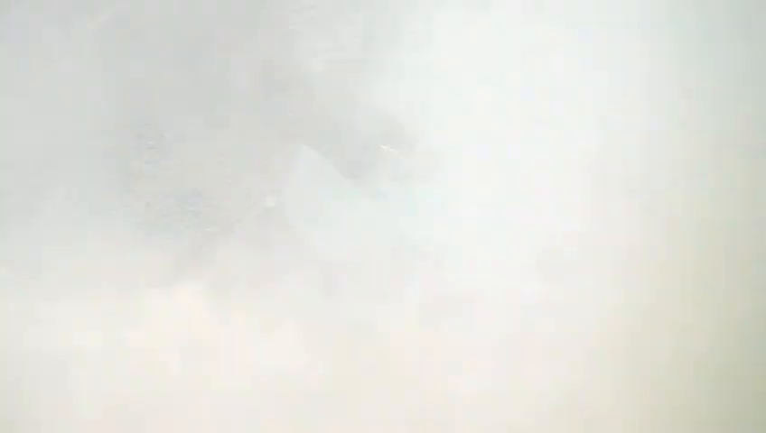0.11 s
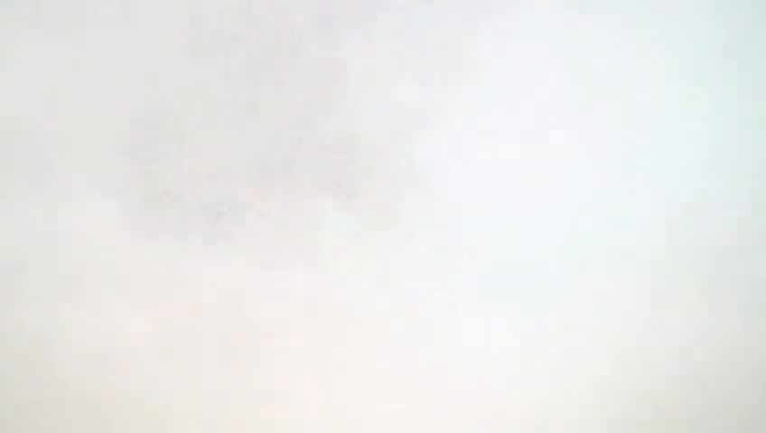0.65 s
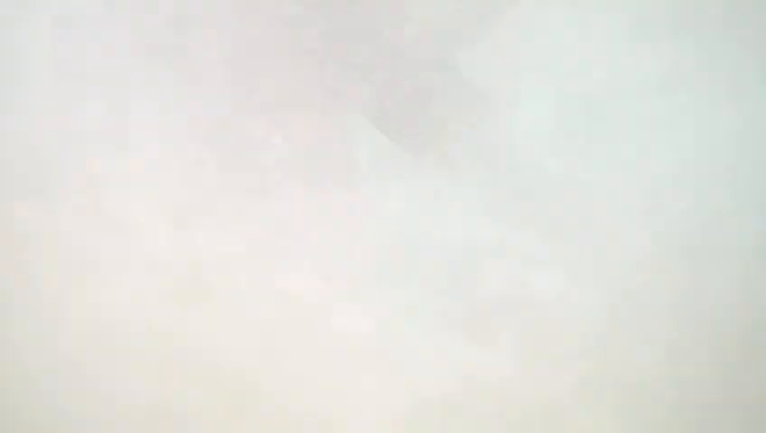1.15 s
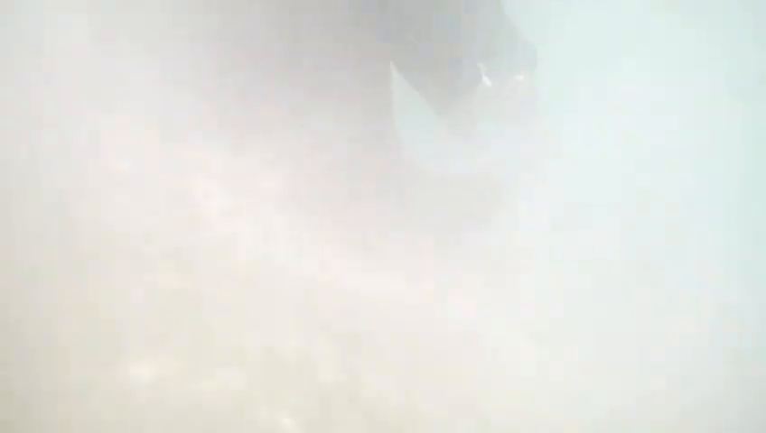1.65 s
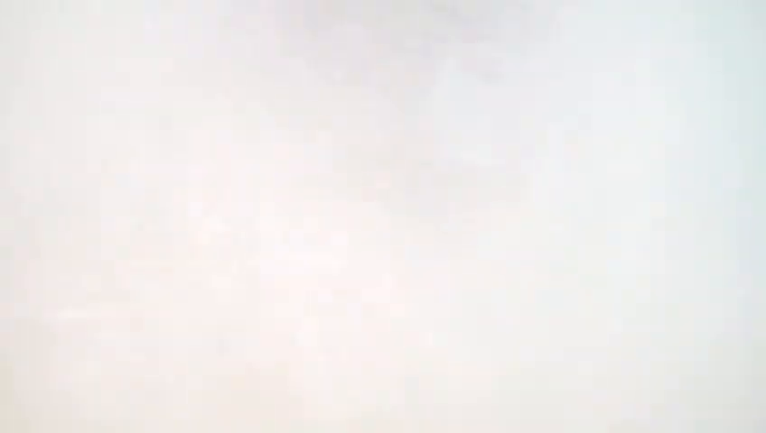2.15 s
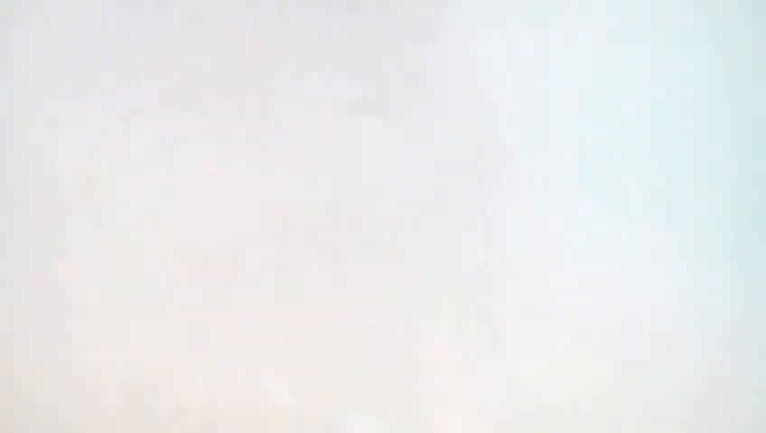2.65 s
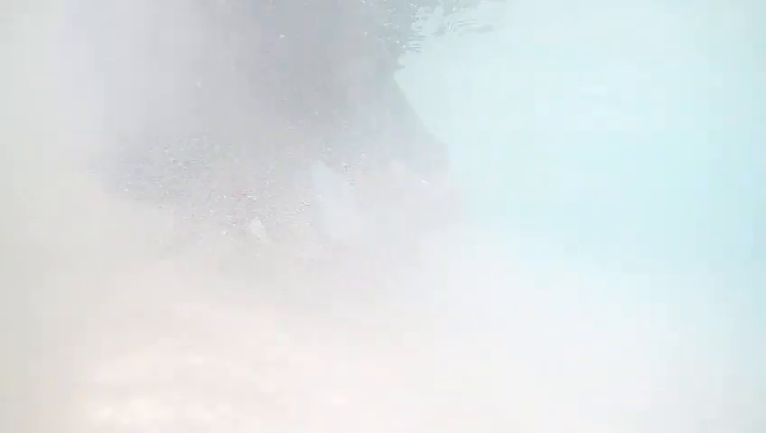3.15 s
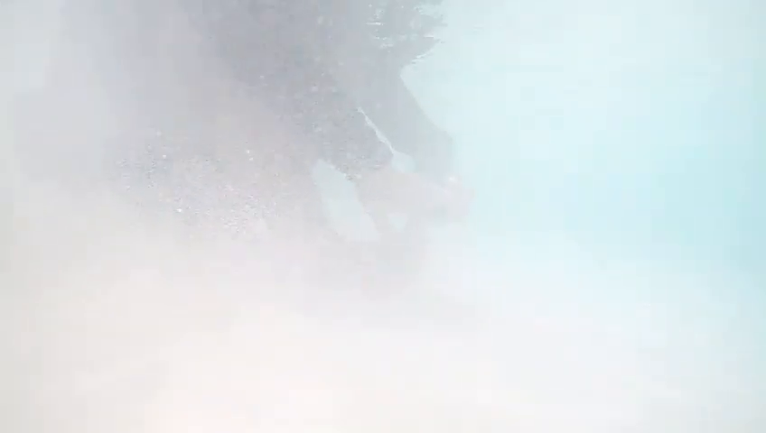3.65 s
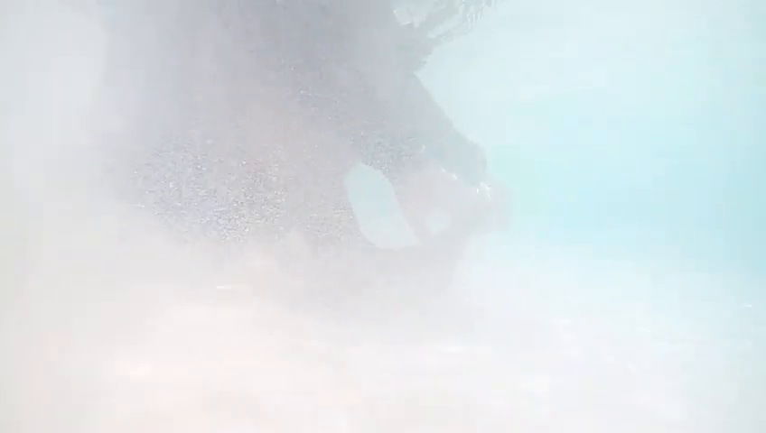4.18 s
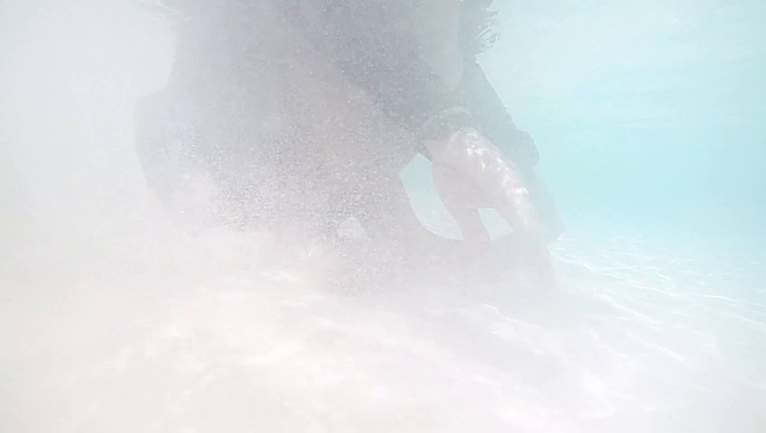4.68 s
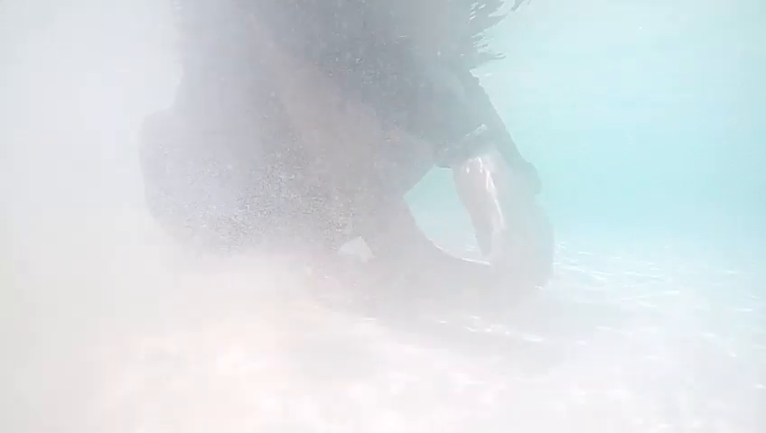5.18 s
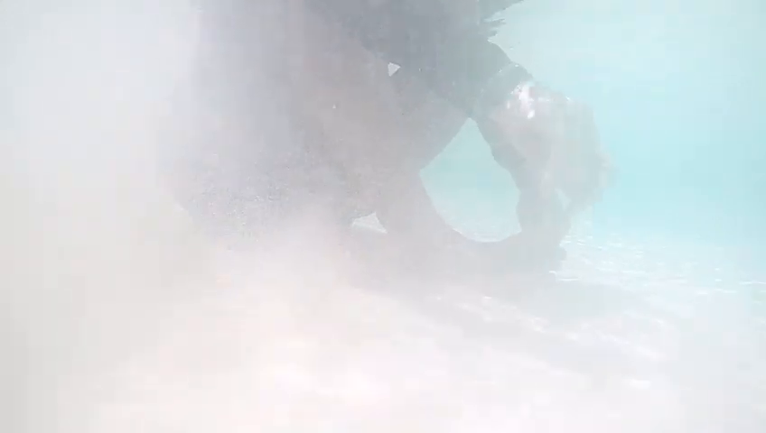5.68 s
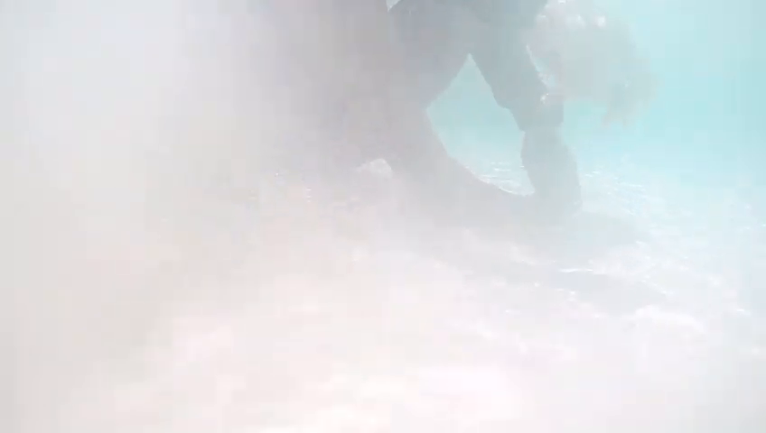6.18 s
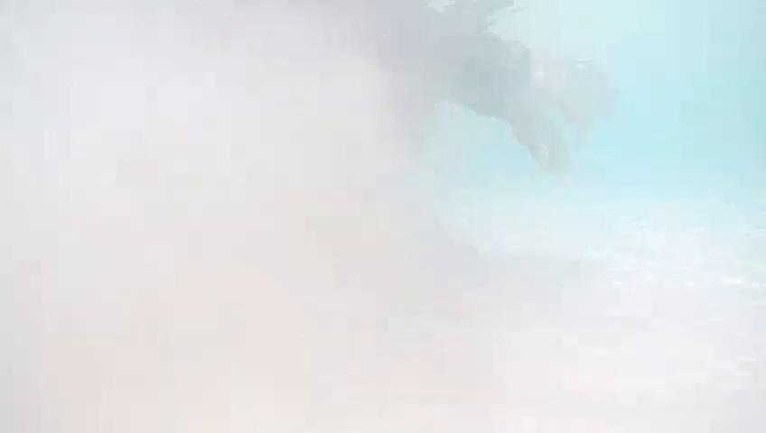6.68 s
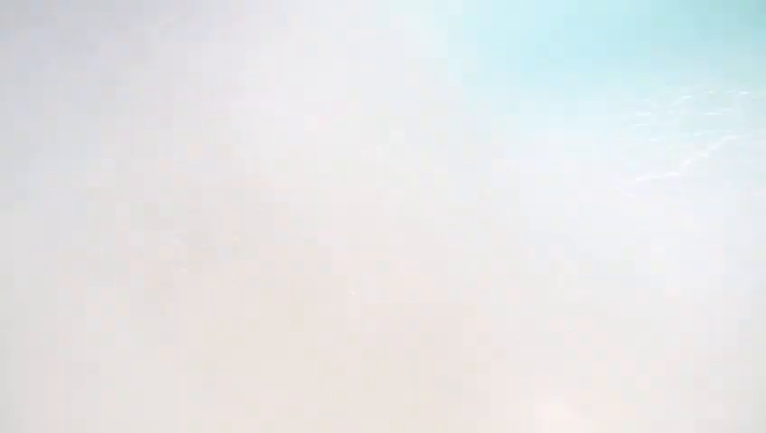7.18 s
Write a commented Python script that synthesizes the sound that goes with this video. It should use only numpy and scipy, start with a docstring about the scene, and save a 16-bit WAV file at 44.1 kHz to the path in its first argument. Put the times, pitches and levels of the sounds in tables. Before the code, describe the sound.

A microphone sealed inside a camera case hears low boxy booms as the case is handled on a sandy seabed. Creaky scrapes, taps and short bubbling tones ride over a low rumbling drone and soft grainy wash. Busy at the start, sparser in the middle with a loud cluster past four seconds, then a swell of water and closing knocks.

```python
"""Sealed housing in sandy shallows

A microphone sits in a sealed housing held under shallow, sandy water. Knocks and shoves are short, low
tones, the booms of the air cavity inside. Grit, fingers and sand are bursts and streams of noise that tick,
scrape and hiss through the shell's resonances; short gliding tones glug, hum and squeak, and once the grip
judders. Moving water rumbles, drones and gurgles as shaped noise. A limiter holds the loudest booms."""
import sys
import numpy as np
from scipy import signal
from scipy.io import wavfile
from scipy.ndimage import uniform_filter1d, minimum_filter1d

SR = 44100
rng = np.random.default_rng(int(sys.argv[2]) if len(sys.argv) > 2 else 0)


def unload_wav(signal):
    """Save mono or channel-first audio to the path in sys.argv[1] as 16-bit WAV at rate SR, clipped to [-1, 1]."""
    wavfile.write(
        sys.argv[1],
        SR,
        np.round(np.clip(np.atleast_2d(signal).T, -1, 1) * 32767).astype(np.int16),
    )


def ratio(d):
    """dB to gain"""
    e = np.asarray(d, float) / 20
    return 10 ** e


N = 322812   # samples in the scene

# Levels in the tables are relative: filters and mixing gains come on top.
# knocks that set the cavity booming: t/s, level/dB, f/Hz, length/s
KNOCK_EVENTS = [(0.072, -8, 180, 0.04), (.188, -9, 180, .022), (0.153, -7.5, 156, 0.034),
                (0.274, -3, 213, 0.041), (0.43, -6, 161, 0.031), (0.541, -10.5, 152, 0.026),
                (0.655, -4, 136.8, 0.063), (0.731, -6.5, 157.5, 0.083), (0.789, -11.5, 180.3, 0.068),
                (0.891, -3.5, 144.7, 0.036), (1.206, -3, 146.6, 0.042), (1.245, -3.5, 140, 0.043),
                (1.297, -9.5, 165, 0.031), (1.53, -3, 166.4, 0.037), (1.586, -7.5, 164, 0.038),
                (1.692, -6, 182, 0.039), (1.737, -15.5, 172, 0.035), (1.957, -16, 139.3, 0.05),
                (2.089, -9, 167, 0.038), (2.137, -10.5, 172, 0.033), (2.23, -13, 164, 0.024),
                (2.323, -14.5, 175, 0.048), (2.416, -14, 185.7, 0.069), (2.612, -8.5, 156, 0.03),
                (2.662, -4.5, 179, 0.047), (2.745, -4.5, 146, 0.04), (2.993, -11.5, 190.6, 0.031),
                (3.156, 2, 179.4, 0.03), (3.192, 0, 168.3, 0.03), (3.342, -3, 173, 0.046),
                (3.673, -8.5, 156.6, 0.045), (3.703, -1.5, 164, 0.038), (4.077, -17, 163, 0.038),
                (4.184, -12.5, 136.3, 0.04), (4.312, 0.5, 177.9, 0.053), (4.36, 2, 171.6, 0.031),
                (4.409, 3, 160, 0.049), (4.449, -4.5, 174.7, 0.056), (4.754, -15, 145.3, 0.044),
                (5.045, 1.5, 176.4, 0.062), (5.246, -16.5, 166, 0.035), (5.863, -11.5, 174.2, 0.055),
                (6.288, -8, 155, 0.041), (6.772, -2, 156.8, 0.032), (6.963, -5.5, 194, 0.028),
                (7.019, -6.5, 142, 0.021), (7.117, -11, 195, 0.042), (7.138, -4, 140, 0.037),
                (7.182, 0.5, 171.3, 0.056), (7.303, -7.5, 185.2, 0.053)]
# sharp ticks on the shell: t/s, level/dB, treble against middle/dB
TICK_EVENTS = [(.113, -24, -12), (.205, -28, -25), (0.181, -15.5, -26.5), (0.4338, -22.5, -2.5),
               (0.4796, -25, -41.5), (0.5136, -11, -25.5), (0.5629, -16.5, -19), (0.676, -21.5, -15.5),
               (1.1987, -20, -10), (1.208, -20, -18), (1.2382, -14, -18), (1.26, -26, -18),
               (1.291, -36, -6.5), (1.5259, -14.5, -22.5), (1.5845, -31.5, -12), (1.6823, -44, 6.5),
               (1.725, -27.5, -25), (1.781, -39.5, 0), (1.9614, -25, -13), (2.0404, -36.5, -7),
               (2.14, -22, 1), (2.2276, -26, -33), (2.414, -34, -20), (2.4887, -28, -25), (2.726, -25, -14),
               (2.742, -25, -16), (3.1555, -13.5, -17), (3.1896, -15, -16), (3.6687, -30.5, -5.5),
               (4.3298, -26.5, 0.5), (4.3595, -17, -14), (4.5265, -37, 3.5), (4.7432, -32.5, -36),
               (6.4405, -32, -6), (6.93, -20, -12), (7.183, -24, -25)]
# scrapes and swishes: t/s, hiss level/dB, creak against hiss/dB, length/s
SCRAPE_EVENTS = [(.068, -35, 5, .13), (0.261, -31, 3, 0.038), (0.298, -27.5, -5, 0.041),
                 (.526, -36.5, 1, 0.033), (0.625, -41, 2, 0.13), (.74, -39, 4.5, .054),
                 (.794, -39, 1.5, .023), (0.859, -38.5, 8, 0.045), (.926, -43.5, 11, .011),
                 (1.175, -40.5, 16, 0.044), (1.232, -43.5, 15.5, 0.046), (1.612, -48, -.5, .11),
                 (1.677, -54, 20, .03), (1.72, -48, 16.5, 0.028), (1.944, -47.5, 15, .036),
                 (2.08, -42.5, 16.5, .02), (2.119, -37, -7, .1), (2.61, -32, -1, .068),
                 (2.711, -44, 10.5, 0.054), (3.238, -35, -22, 0.038), (3.317, -37, -3.5, .035),
                 (3.35, -47, -3, 0.05), (3.661, -34.5, -1, .033), (3.698, -33, -16, 0.093),
                 (3.778, -40.5, -9, 0.048), (3.833, -47, 0.5, 0.071), (4.278, -40, 7, 0.084),
                 (4.384, -46, 11, .09), (4.454, -47.5, -2, 0.066), (4.732, -56.5, 13, 0.043),
                 (5.129, -46, 3, .15), (6.12, -38, 3, .19), (6.83, -40.5, 4, .093),
                 (6.919, -29.5, 11, 0.027), (6.94, -42, 13, .065), (6.991, -34.5, -7, 0.076),
                 (7.03, -37, -5, .18), (7.145, -43, 17, .06)]
# resonances of the shell: f/Hz, width/Hz, level/dB
SHELL_MODES = [(1800, 150, 2.5), (2750, 300, -9.5), (4120, 160, -13), (4800, 420, -4), (5540, 170, -4),
               (8670, 1100, -21.5), (12500, 1100, -41)]
# broad sound passed by the shell wall: f/Hz, level/dB
WALL_SPECTRUM = [(150, -15), (250, -17.5), (559, -1.5), (664, -11), (748, -8.5), (858, -9.5), (1150, -24),
                 (1820, -20.5), (3100, -40.5), (4520, -25), (5550, -21), (6810, -41), (15000, -70)]
# lower shell modes that creak: f/Hz, width/Hz, level/dB
CREAK_MODES = [(370, 44.4, 6), (500, 66, 0.5), (650, 82, -2), (841.6, 45, -1), (926, 176, -5.5)]
# the wall under streaming water: f/Hz, width/Hz, level/dB
GURGLE_MODES = [(290, 100, 5), (430, 150, 4), (640, 130, -2), (830, 100, 0), (960, 120, -2)]
# the air cavity inside: f/Hz, width/Hz, level/dB
CAVITY_MODES = [(151.4, 54.6, -0.5), (188.4, 50.7, 1)]
# a faint high hiss that swells and fades slowly: t/s, level/dB
HISS_CURVE = [(0.0, -62.5), (1.61, -74), (3.12, -66), (5.44, -72.5), (6.99, -58.5), (7.32, -65.5)]
# how fast water streams along the shell, as dull wash: t/s, level/dB
STREAM_CURVE = [(0, -43), (.25, -45), (.51, -50), (1.1, -52), (1.35, -61), (1.85, -58), (2.2, -52),
                (2.39, -58), (2.62, -50), (2.8, -59), (3.2, -54), (3.4, -64), (4.08, -61), (4.34, -49),
                (4.52, -65), (4.88, -64), (5.14, -54), (5.28, -66), (5.5, -64), (5.93, -51), (6.15, -40),
                (6.29, -39.5), (6.34, -49), (6.8, -47), (7, -41), (7.32, -45)]
# short gliding tones (low glugs, a faint hum, higher squeaks): t/s, level/dB, start f/Hz, end f/Hz, length/s
GLIDE_EVENTS = [(.088, -19, 330, 370, .025), (0.132, -13, 320, 345, 0.022), (.155, -14, 300, 340, 0.03),
                (0.162, -25, 618, 652, 0.035), (0.237, -38, 1310, 1425, .02),
                (0.432, -37.5, 1390, 1454, 0.019), (.515, -17, 500, 513, 0.016),
                (0.542, -25.5, 1800, 1870, 0.0057), (0.556, -34, 3080, 3130, .007),
                (0.558, -33.5, 3960, 4150, 0.0092), (0.635, -22, 490, 718, .035),
                (.672, -23, 565, 946, .022), (.681, -21.5, 450, 494, .014), (0.696, -19.5, 577, 661, .045),
                (0.748, -20.5, 524, 822, 0.033), (0.797, -18.5, 687, 845, 0.0095),
                (0.863, -17.5, 800, 866, .024), (1.718, -62, 12900, 11800, .007),
                (1.74, -61, 11900, 12500, .008), (1.894, -57, 9400, 8450, .012),
                (1.906, -62, 8600, 9800, .018), (2.08, -27, 820, 972, 0.0081), (2.528, -35, 345, 365, .12),
                (2.614, -35, 2750, 2620, .011), (2.614, -35, 5450, 5280, .011),
                (2.628, -32, 1910, 1936, 0.008), (2.632, -40, 4150, 3980, .022),
                (3.236, -33.5, 1926, 1790, 0.047), (3.259, -35, 4700, 4240, 0.013),
                (3.672, -14.5, 296, 264, 0.05), (3.781, -34.5, 4960, 4510, .04),
                (3.709, -23, 945, 1050, .007), (3.715, -28, 1300, 1545, .01),
                (3.733, -25, 1100, 1200, 0.012), (3.758, -27, 1290, 1390, .012),
                (3.767, -27.5, 1760, 1800, .02), (6.836, -24, 430, 500, .016), (6.85, -23, 600, 680, 0.028),
                (6.888, -28, 600, 625, .035), (6.866, -33.5, 1935, 1800, 0.049),
                (6.926, -33.5, 1845, 1654, 0.032), (7.002, -20, 600, 670, 0.048),
                (7.112, -29, 633, 680, 0.049), (7.147, -16, 620, 704, .022), (7.15, -22, 900, 860, .014),
                (7.171, -21, 680, 640, 0.028)]
# partials of a gliding tone, from the fundamental up: level/dB
GLIDE_PARTIALS_DB = [0, -18, -22, -33]
# heavy low shoves of water on the wall: t/s, level/dB, f/Hz
SHOVE_EVENTS = [(0.098, -10, 65), (0.403, -12.5, 56), (0.488, -6.5, 38.8), (0.711, -6.5, 67.3),
                (0.8, -4.5, 104), (1.1, -12, 55), (1.189, -2, 103.5), (1.24, -10, 60), (1.511, -11, 96),
                (1.719, -12, 102), (2.045, -9, 89), (2.069, -2, 70.5), (2.664, 1, 73.4), (3.22, -16.5, 70),
                (3.33, -13, 81), (3.651, -12.5, 109), (4.157, -10.5, 44.3), (4.317, -11, 46),
                (4.36, -9.5, 80), (4.43, -8, 90), (4.745, -19, 80.7), (5.605, -11, 83), (5.68, -15, 45),
                (5.78, -15, 60)]
# how hard the water shoves the housing, as cavity drone: t/s, level/dB
SURGE_CURVE = [(0, -20), (.5, -25), (.85, -17), (.96, -24), (1.3, -30), (1.53, -34), (1.75, -25),
               (2.18, -23), (2.4, -33), (2.6, -26), (2.95, -32), (3.22, -27), (3.45, -34), (4.12, -34.5),
               (4.34, -19.5), (4.54, -33), (4.93, -26.5), (5.28, -37), (5.57, -32), (6.1, -19), (6.4, -26),
               (6.95, -19), (7.32, -24.5)]
# the wall under the fingers: f/Hz, width/Hz, level/dB
RAP_MODES = [(500, 200, -0.5), (694, 200, -0.5), (900, 190, 0)]
# how much fine sand the water carries, as bright grains: t/s, level against the wash/dB
SAND_CURVE = [(0, 1), (1.3, 1), (2.4, -1), (4.2, -2), (5.15, -7), (5.9, -6), (6.2, -7), (6.45, -2), (7, 3),
              (7.32, -2)]

LIMIT_DB = -.7   # highest peak the limiter lets through
RUMBLE_DB, RUMBLE_FOLLOWS = -30, 0.83   # level at mean surge; share of the surge's swing
GURGLE_DB = -48   # at mean stream and surge
GURGLE_FOLLOWS_STREAM, GURGLE_FOLLOWS_SURGE = .95, .1   # shares of their swings
HUM_DB = -21   # the cavity's faint octave, against its drone
SILT_DB = 1.5   # dull part of the sand, against the wash
DULL_DB, DULL_PER_CREAK = 3.5, -0.16   # the more a scrape creaks, the less dull its hiss
# the grip judders: it lets go again and again at an even pace
JUDDER_START_S, JUDDER_EVERY_S, JUDDER_HOLD_S = 0.98, .0438, .028
JUDDER_HZ, JUDDER_BOOM_DB, JUDDER_RATTLE_DB, JUDDER_HISS_DB = 148.6, -7, -20, -42   # relative levels
RAP_HZ, RAP_JITTER_S = 150, .0005   # slaps a second, and how unevenly they fall


def rms_one(x):
    """Scale a sound to an average strength (rms) of 1."""
    return x / np.sqrt(np.mean(x ** 2) + 1e-20)


def in_time(rows):
    """Draw each column of a curve out sample by sample, in straight lines between its points."""
    s, *columns = np.transpose(rows)
    return [np.interp(np.arange(N) / SR, s, c) for c in columns]


def drift(rate):
    """Slow random wandering of spread 1: noise smoothed twice below about rate Hz."""
    # computed at every 40th sample only; the first 2000 values let the filter settle
    r = np.exp(-80 * np.pi * rate / SR)
    noise = rng.standard_normal(N // 40 + 2002)
    slow = signal.lfilter([1], [1, -2 * r, r * r], noise)[2000:]
    return np.interp(np.arange(N) / 40, np.arange(len(slow)), rms_one(slow))


def band(x, low_hz, high_hz, order=2):
    """Keep only the sound between two frequencies (Butterworth band-pass)."""
    return signal.sosfilt(signal.butter(order, [low_hz, high_hz], "band", fs=SR, output="sos"), x)


def resonate(x, modes, patchy_db=0):
    """Ring resonances side by side with alternating signs; each may flicker on its own."""
    out = 0
    for k, (hz, width, db) in enumerate(modes):
        r = np.exp(-np.pi * width / SR)   # a wider resonance dies away sooner
        top = (1 - r * r) / 2 * np.array([1, 0, -1])
        bottom = [1, -2 * r * np.cos(2 * np.pi * hz / SR), r * r]
        gain = ratio(db + patchy_db * drift(22)) if patchy_db else ratio(db)
        out = out + (-1) ** k * gain * signal.lfilter(top, bottom, x)
    return out


def shell(x, patchy_db=0):
    """The wall passes a broad, tilted spectrum; its resonances stand on top."""
    hz, db = np.transpose(WALL_SPECTRUM)
    grid = np.linspace(0, SR / 2, 1025)
    wall_db = np.interp(np.log(grid + 1), np.log(hz), db)
    # dB doubled here, because minimum_phase takes the square root of the response
    taps = signal.firwin2(1023, grid, ratio(2 * wall_db) + 1e-9, fs=SR)
    through_wall = signal.fftconvolve(x, signal.minimum_phase(taps))[:N]
    return ratio(-1.5) * through_wall + ratio(-25.5) * resonate(x, SHELL_MODES, patchy_db)


def hump(length, skew):
    """An envelope that rises, crests and falls within its length in seconds."""
    count = max(int(length * SR), 8)
    return np.sin(np.pi * (np.arange(count) / count) ** skew)


def add(out, s, x):
    """Mix x into out from second s."""
    at = round(s * SR)
    out[at:at + len(x)] += x[:N - at]


def grit(per_s, spread_db):
    """Single-sample grains at random moments, of uneven size; rms 1."""
    sizes = ratio(spread_db * np.minimum(rng.exponential(1, N), 5)) * rng.choice([-1, 1], N)
    return rms_one(sizes * (rng.random(N) < per_s / SR))


def ringing_grains(per_s, low_hz, high_hz, cycles):
    """Short ringing grains at random moments, each at one of 18 pitches; rms 1."""
    grains, pitches = grit(per_s, 3.87), np.geomspace(low_hz, high_hz, 18)
    dealt = rng.integers(0, len(pitches), N)   # which pitch each grain gets
    rings = [resonate(grains * (dealt == k) + 1e-18, [(hz, hz / cycles, 0)]) for k, hz in enumerate(pitches)]
    return rms_one(sum(rings))


def judder_times(count=5):
    """The moments at which the juddering grip lets go."""
    return JUDDER_START_S + JUDDER_EVERY_S * np.arange(count)


def knocks():
    """Each boom beats between two cavity modes and is choked by the water; shoves last 2.52 cycles."""
    booms, jolt = np.zeros((2, N))
    slid = [(s + 0.0121, JUDDER_BOOM_DB, JUDDER_HZ, JUDDER_HOLD_S + .008) for s in judder_times()]
    shoves = [(s, db, hz, 2.52 / hz) for s, db, hz in SHOVE_EVENTS]
    for s, db, hz, length in KNOCK_EVENTS + slid + shoves:
        envelope = hump(length, .85) ** min(.05 / length, 1.5)
        t = np.arange(len(envelope)) / SR
        boom = np.sin(2 * np.pi * hz * t)
        boom += .25 * np.sin(2 * np.pi * 1.241 * hz * t)   # second cavity mode
        boom += 0.026 * np.sin(4 * np.pi * hz * t)   # faint octave
        add(booms, max(s - .008, 0), ratio(db) * envelope * boom)
        add(jolt, s, ratio(db) * np.exp(-t / 0.011))
    # the blow also shakes the wall above the boom for a moment
    shaken_wall = band(jolt * rng.standard_normal(N), 230, 480, order=3) * ratio(-5.0)
    return band(booms, 20, 700) + shaken_wall


def ticks():
    """A crack of a few milliseconds, dull in the middle, ringing the shell in the treble."""
    middle, treble = np.full((2, N), 1e-18)
    t = np.arange(300) / SR
    cracks = rng.standard_normal((len(TICK_EVENTS), len(t))) * np.exp(-t / 0.0029)
    for (s, db, treble_db), crack in zip(TICK_EVENTS, cracks):
        add(middle, s, ratio(db) * crack)
        add(treble, s, ratio(db + treble_db) * crack)
    dull = band(band(middle, 240, 1000, order=1), 230, 2300, order=4) * ratio(10.0)
    ringing = band(shell(treble), 3900, 15000, order=3) * ratio(33.5)
    return dull + ringing


def scrapes():
    """Dense slips hiss in the shell and creak in its lower modes; short ones start and stop abruptly."""
    bright_level, dull_level, creak_level = np.zeros((3, N))
    slid = [(s, JUDDER_HISS_DB, 0, JUDDER_HOLD_S) for s in judder_times()]
    for s, db, creak_db, length in SCRAPE_EVENTS + slid:
        envelope = hump(length, 0.87) ** (0.34 + 1.8 * length)
        add(bright_level, s, ratio(db) * envelope)
        add(dull_level, s, ratio(db + DULL_DB + DULL_PER_CREAK * creak_db) * envelope)
        add(creak_level, s, ratio(db + creak_db) * envelope)
    # the ringing grains give the hiss a tonal grain
    rubbing = grit(5000, 0.69) + 0.36 * ringing_grains(500, 1300, 6500, 42)
    hiss = rms_one(band(shell(rubbing, patchy_db=4.0), 1200, 14000))
    bright, dull = band(hiss, 2440, 21000, order=3), band(hiss, 1000, 3080, order=3)
    # the grip lets go about once per cycle of the cavity, so the creak throbs at that rate
    throb_hz = 155 * (1 + .12 * drift(30.2))
    throb = np.maximum(np.sin(2 * np.pi * np.cumsum(throb_hz) / SR), 0) ** 3.7
    slips = grit(6000, 2.0) * (0.3 + 1.87 * throb) * creak_level
    creak = band(resonate(slips, CREAK_MODES, patchy_db=2.5), 280, 1125, order=4) * ratio(17.5)
    return bright * bright_level + dull * dull_level + creak


def gliding_tones():
    """Low glugs, a faint hum and higher squeaks: short tones with overtones, unsteady in pitch and strength."""
    out, waver, flutter = np.zeros(N), drift(90), drift(160)
    for s, db, start_hz, end_hz, length in GLIDE_EVENTS:
        envelope = hump(length, 0.52) ** 0.37
        at = round(s * SR)
        here = slice(at, at + len(envelope))
        # the pitch moves fast at first, then settles at its end
        glide = end_hz + (start_hz - end_hz) * np.linspace(1, 0, len(envelope)) ** 3.5
        pitch = glide + 0.035 * np.minimum(glide, 1200) * waver[here]
        phase = 2 * np.pi * np.cumsum(pitch) / SR
        tone = sum(ratio(partial_db) * np.sin((k + 1) * phase)
                   for k, partial_db in enumerate(GLIDE_PARTIALS_DB) if (k + 1) * start_hz < SR / 3)
        add(out, s, ratio(db + 2.08 * flutter[here]) * envelope * tone)
    return out


def judder(count=4):
    """Each time the grip slides, the wall slaps back about once per cavity cycle: a row of dull raps."""
    raps = np.full(N, 1e-18)
    t = np.arange(200) / SR
    for s in judder_times():
        for late in np.arange(count) / RAP_HZ + RAP_JITTER_S * rng.standard_normal(count):
            strength = ratio(2.0 * rng.standard_normal())
            roughness = 1 + .45 * rng.standard_normal(len(t))
            add(raps, s + .003 + late, strength * roughness * np.exp(-t / .0003))
    rattle = band(resonate(raps, RAP_MODES, patchy_db=4.0), 330, 1050, order=4)
    return ratio(JUDDER_RATTLE_DB + 16) * rattle


def water():
    """Turbulence thumps the wall, drives the cavity, gurgles and washes sand along the shell."""
    (surge_db,), (wash_db,) = in_time(SURGE_CURVE), in_time(STREAM_CURVE)
    push_db, flow_db = surge_db - surge_db.mean(), wash_db - wash_db.mean()

    rumble_db = RUMBLE_DB + RUMBLE_FOLLOWS * push_db + 5.3 * drift(17) + 2.35 * drift(16)
    rumble = rms_one(band(rng.standard_normal(N), 34, 107.7)) * ratio(rumble_db)

    push = rng.standard_normal(N) * ratio(surge_db + 2.5 * drift(25))
    drone = resonate(resonate(push, CAVITY_MODES), [(172, 70, 0.0013)]) * ratio(27.5)
    # squaring makes the octave; dividing by the surge keeps it in step with the drone
    drone = drone + band(drone ** 2, 310, 420) * ratio(HUM_DB - surge_db)

    gurgle_db = GURGLE_DB + GURGLE_FOLLOWS_STREAM * flow_db + GURGLE_FOLLOWS_SURGE * push_db
    swirl = grit(2500, 2.5) + 0.12 * ringing_grains(430, 280, 1107, 13)
    on_wall = resonate(swirl, GURGLE_MODES, patchy_db=1.5) + 0.033 * swirl
    gurgle = rms_one(band(on_wall, 220, 1400, order=3)) * ratio(gurgle_db + 1.8 * drift(20))

    sand = rms_one(band(shell(grit(9000, 1.3), patchy_db=4.5), 1150, 15000))
    silt = band(sand, 900, 3100, order=3) * ratio(wash_db + SILT_DB + 1.5 * drift(15))
    grains_db = wash_db + in_time(SAND_CURVE)[0] + 0.5 * drift(30)
    grains = band(sand, 3100, 16000, order=3) * ratio(grains_db)
    return rumble + drone + gurgle + silt + grains


def high_hiss():
    """A faint band of high noise that swells and fades slowly."""
    return rms_one(band(rng.standard_normal(N), 7600, 10740)) * ratio(in_time(HISS_CURVE)[0])


def scene():
    """All sounds reach the one microphone inside."""
    return (knocks() + ticks() + scrapes() + gliding_tones() + judder() + water())[None]


def limit(x):
    """Turn the level down smoothly just before and after each peak above the limit."""
    need = np.minimum(1, ratio(LIMIT_DB) / (np.abs(x) + 1e-9))
    gain = uniform_filter1d(minimum_filter1d(need, size=301), size=301)   # about 7 ms wide
    return x * gain


def band_limit(x):
    """A steep low-pass at the top of the band."""
    return signal.sosfilt(signal.butter(12, 15130, fs=SR, output="sos"), x)


def record(dry):
    """Add the faint high hiss, dull the top, then hold the peaks with a fast look-ahead limiter."""
    dull_top = signal.butter(8, 14200, fs=SR, output="sos")
    mix = limit(signal.sosfilt(dull_top, dry[0] + high_hiss()))
    return band_limit(mix[None])


dry = scene()
out = record(dry)
unload_wav(out)
```